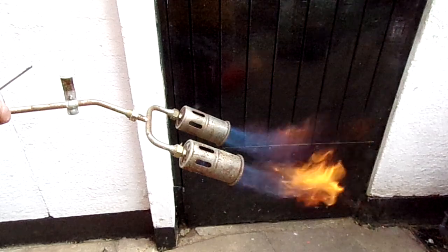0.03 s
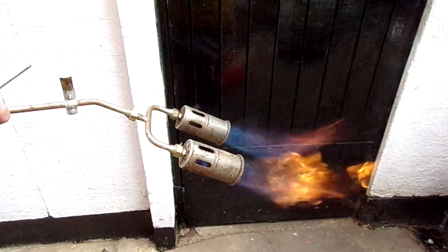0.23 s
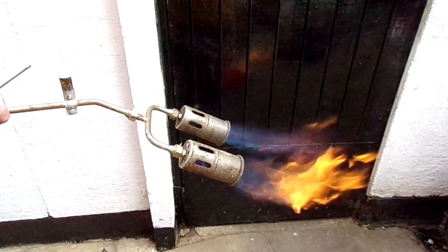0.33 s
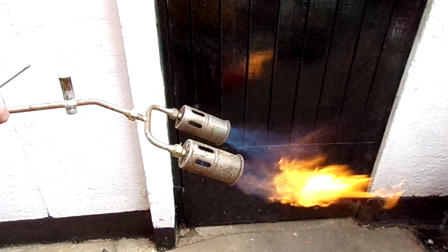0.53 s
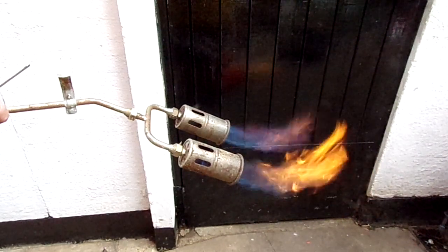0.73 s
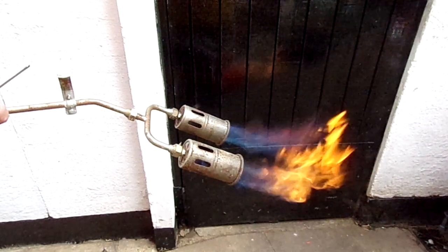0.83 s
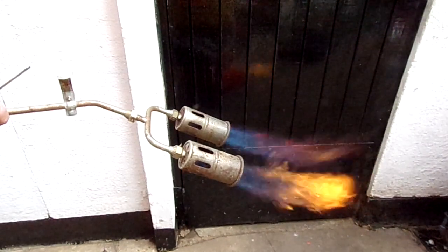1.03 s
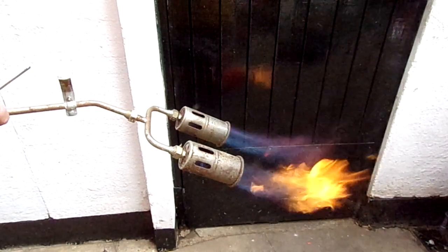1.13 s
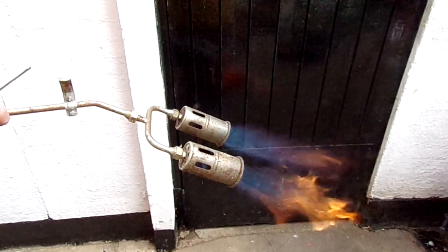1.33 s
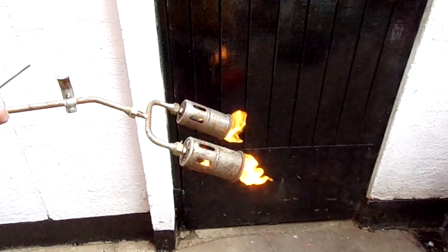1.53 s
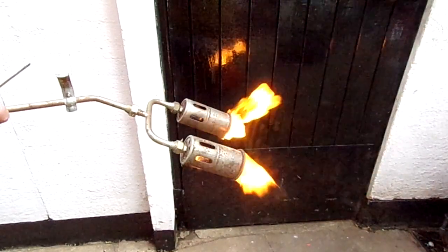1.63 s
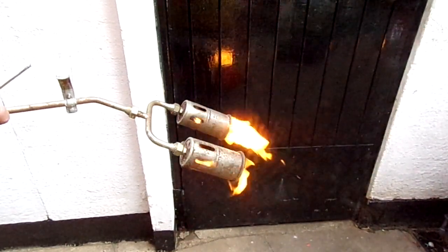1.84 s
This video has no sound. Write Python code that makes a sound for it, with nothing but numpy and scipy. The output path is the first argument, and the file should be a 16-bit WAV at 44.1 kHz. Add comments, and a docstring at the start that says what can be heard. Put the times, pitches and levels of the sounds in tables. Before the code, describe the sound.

Close to the microphone, in front of a door, a gas torch swells into a loud, hissing roar. Then the gas is cut back, leaving a small metal clack and a quiet, fluttering flame.

```python
"""A twin-cup propane torch, opened up in front of a door and heard from close by.
Its blue jets roar and ring their steel cups while gas hisses from the nozzles, both shaken by one
turbulence. The gas is cut back, the valve clacks, and a lazy yellow flame goes on fluttering over a
thin whistle of gas. The walls and door return a short, dull tail to the microphone."""
import sys
import numpy as np
from scipy import signal
from scipy.fft import rfft, irfft
from scipy.io import wavfile

SR = 44100
rng = np.random.default_rng(int(sys.argv[2]) if len(sys.argv) > 2 else 0)


def log_audio(samples):
    """Write samples as a 16-bit WAV file to the path given in sys.argv[1]."""
    # one column per channel
    frames = np.atleast_2d(samples).T
    # limit to full scale, then quantise
    limited = np.clip(frames, -1, 1)
    pcm = np.round(limited * 32767).astype(np.int16)
    wavfile.write(sys.argv[1], SR, pcm)


N = 83790
BAND_TOP_HZ = 15740

# The blue jets, the flame body and the cups' howl. Each row: time in seconds, level in dB.
JET_LEVEL = [(.034, -100), (.038, -50.5), (.065, -43), (.15, -40), (.22, -34), (.32, -32), (.39, -24.5),
             (.5, -22.5), (.8, -21.5), (1.04, -23), (1.17, -22), (1.29, -24), (1.38, -22.5), (1.42, -36),
             (1.47, -58), (1.54, -81)]
RUMBLE_LEVEL = [(.033, -100), (.05, -49), (.18, -53), (.22, -42.5), (.35, -43), (.4, -34), (.6, -31),
                (.8, -32), (.9, -39.5), (1.0, -29.5), (1.1, -43), (1.2, -27), (1.28, -35.5), (1.38, -37),
                (1.44, -39.5), (1.54, -74)]
HOWL_LEVEL = [(.034, -110), (.06, -59), (.55, -42), (.7, -28.5), (.9, -36.5), (.97, -54), (1.03, -29),
              (1.09, -46.5), (1.17, -24), (1.34, -35.5), (1.41, -56), (1.46, -100)]
# The tone of the jets and of the flame body. Each row: frequency in Hz, relative level in dB.
JET_SPECTRUM = [(25, -49), (100, -22), (168, -30), (196, -1), (270, 0), (305, -5.5), (335, -5),
                (370, -10.5), (490, -15.5), (570, -15), (690, -27), (780, -13.5), (1100, -13), (1400, -14),
                (1550, -12), (2100, -15), (2800, -18.5), (4200, -22.5), (8000, -49), (16000, -62)]
RUMBLE_SPECTRUM = [(22, -29), (45, -20), (64, -21), (84, 5), (98, -9), (117, 10.5), (145, -1), (165, 5.5),
                   (200, -44), (500, -74)]
# The steel cups' resonances. Each row: frequency in Hz, width in Hz, relative level in dB.
CUP_RESONANCES = [(606, 42.5, -3), (812, 176, -9), (966, 55, -14.5), (1300, 33, -6.5), (1827, 160, -6),
                  (2036, 95, -8), (2514, 167, -10), (3040, 52, -19.5), (3233, 65, -15)]

def blue_jets(flutter_db):
    """The jets burn and ring the cups, whose main resonance howls over the flame body's rumble."""
    roar = amp(curve(JET_LEVEL)) * colour(combustion(flutter_db), JET_SPECTRUM, CUP_RESONANCES)
    rumble = amp(curve(RUMBLE_LEVEL)) * colour(rng.standard_normal(N), RUMBLE_SPECTRUM)
    howl_db = curve(HOWL_LEVEL) + 1.2 * wander(rate_hz=78)
    howl = amp(howl_db) * whistle(hz=615.4, width_hz=22)
    return roar + rumble + howl


def combustion(flutter_db, bursts_per_s=1800, crackle_share=0.15):
    """Turbulent burning: a rush and many tiny bursts, fluttering together."""
    onsets = rng.random(N) < bursts_per_s / SR
    bursts = onsets * amp(1.5 * np.minimum(rng.exponential(1, N), 4))
    crackle = np.sqrt(crackle_share) * unit(bursts - bursts.mean())
    rush = np.sqrt(1 - crackle_share) * rng.standard_normal(N)
    return (rush + crackle) * amp(flutter_db)


# Gas rushing from the nozzles. Each row: time in seconds, level in dB.
GAS_LEVEL = [(.034, -105), (.037, -66), (.07, -58.5), (.26, -51), (.41, -40), (.48, -38.5), (.7, -38),
             (.98, -38.5), (1.08, -36), (1.26, -42.5), (1.31, -35.5), (1.395, -40), (1.43, -62),
             (1.48, -75), (1.78, -76), (1.9, -65)]
# The tone of that gas at the microphone. Each row: frequency in Hz, relative level in dB.
GAS_SPECTRUM = [(20, -48), (2000, -32), (3800, -10), (5200, 3.5), (6100, -1), (6900, -1), (7800, -10.5),
                (9800, -13), (11000, -12), (13200, -15.5), (14500, -21.5), (16000, -26)]

def gas_hiss(flutter_db, bands=24, sizzle_from_hz=10700):
    """Escaping gas hisses in bands that each swell on their own; the top fades a little less."""
    spectrum = rfft(colour(rng.standard_normal(N), GAS_SPECTRUM))
    hz = np.fft.rfftfreq(N, 1 / SR)
    gas_db = curve(GAS_LEVEL)
    flow_db = gas_db - gas_db.max()  # 0 at full flow, negative below it
    edges = np.linspace(0, BAND_TOP_HZ, bands + 1)
    rush = np.zeros(N)
    for low, high in zip(edges, edges[1:]):
        band = irfft(spectrum * (hz >= low) * (hz < high), N)
        sizzle_db = -0.04 * np.maximum(flow_db, -20) * (low > sizzle_from_hz)
        rush += band * amp(3 * wander(rate_hz=16) + sizzle_db)
    return amp(gas_db + 0.87 * flutter_db) * (unit(rush) + edge_tones(flow_db))


# The two nozzles. Each row: pitch at full flow in Hz, width in Hz, level against the hiss in dB.
NOZZLE_TONES = [(9400, 250, -16.5), (9870, 320, -19)]

def edge_tones(flow_db, rise_hz_per_db=13.5, drift_hz=70.6):
    """Each nozzle sings a broken, breathy tone that rises with the flow."""
    out = np.zeros(N)
    for hz, width_hz, db in NOZZLE_TONES:
        pitch = hz + rise_hz_per_db * flow_db + drift_hz * wander(rate_hz=12.6)
        waver = amp(1.8 * wander(rate_hz=22))
        out += amp(db) * unit(waver * whistle(pitch, width_hz))
    return out


# The yellow flame at the cups. Each row: time in seconds, level in dB.
YELLOW_LEVEL = [(1.36, -54), (1.44, -37), (1.52, -51), (1.58, -43.5), (1.67, -49), (1.71, -46),
                (1.745, -49), (1.785, -47), (1.8, -41), (1.82, -45.5), (1.845, -40.5), (1.9, -44.5)]
# Its tone. Each row: frequency in Hz, relative level in dB.
YELLOW_SPECTRUM = [(25, -10), (80, -4), (190, 0.5), (240, 1), (320, -1), (480, -10.5), (600, -3.5),
                   (690, -9), (800, -8), (1400, -10), (2600, -11.5), (4200, -23), (6800, -28.5),
                   (10000, -49), (16000, -46)]
# Its turbulence. Each row: rate in Hz, depth in dB.
YELLOW_FLUTTER = [(35, .9), (160, 0.73)]
# Pockets of gas catching. Each row: start in seconds, pitch in Hz, level in dB, length in seconds.
GAS_PUFFS = [(1.57, 110, -50, 0.02), (1.617, 71, -41, .028)]

def yellow_flame():
    """With the gas cut back, a soft flame flutters and pockets of gas catch in low puffs."""
    flutter_db = turbulence(YELLOW_FLUTTER)
    alight = np.arange(N) / SR > YELLOW_LEVEL[0][0]
    out = amp(curve(YELLOW_LEVEL)) * alight * colour(combustion(flutter_db), YELLOW_SPECTRUM)
    for start, hz, db, length in GAS_PUFFS:
        t = np.arange(0, length, 1 / SR)
        swell = amp(db) * np.sin(np.pi * t / length)
        add(out, start, swell * np.sin(2 * np.pi * hz * t))
    return out


# The valve lever closing. Each row: start in seconds, gain in dB, treble cutoff in Hz.
LEVER_CONTACTS = [(1.5841, 1.5, 3900), (1.5864, -2, 3900), (1.5891, -1, 12500)]
# The valve's metal. Each row: frequency in Hz, relative level in dB, seconds to fall by 60 dB.
VALVE_MODES = [(2713, -46, .03), (3080, -46, .025), (4060, -52, .09), (4791, -52, .05), (7224, -57, .05),
               (8802, -54, .03)]
# The tone of the lever's scrape. Each row: frequency in Hz, relative level in dB.
SCRAPE_SPECTRUM = [(20, -40), (1500, -18), (2900, 9.5), (5000, -4), (9000, -15), (16000, -30)]

def valve_clack(scrape_db=-36, scrape_t60_s=.032):
    """The lever lands in quick contacts, each a scrape and a short metal ring."""
    out, t = np.zeros(N), np.arange(SR // 5) / SR
    for start, gain_db, cutoff_hz in LEVER_CONTACTS:
        ring = sum(amp(db - 60 * t / t60) * np.sin(2 * np.pi * (hz * t + rng.random()))
                   for hz, db, t60 in VALVE_MODES)
        grit = colour(rng.standard_normal(len(t)), SCRAPE_SPECTRUM)
        scrape = amp(scrape_db - 60 * t / scrape_t60_s) * grit
        lowpass = signal.butter(2, cutoff_hz, fs=SR, output="sos")
        add(out, start, amp(gain_db) * signal.sosfilt(lowpass, ring + scrape))
    return out


# The nearly shut valve, faint behind the flame. Each row: pitch in Hz, width in Hz, level in dB.
TRICKLE_TONES = [(4160, 130, -69.5), (6200, 220, -76), (11070, 280, -79)]

def gas_trickle(start_s=1.45, waver_db=3.5):
    """The last trickle of gas whistles through the valve, coming and going."""
    tones = sum(amp(db + waver_db * wander(rate_hz=12)) * whistle(hz, width_hz)
                for hz, width_hz, db in TRICKLE_TONES)
    return tones * (np.arange(N) / SR > start_s)


def room(direct, tail_db=-16, t60_s=0.29, cutoff_hz=5830):
    """A short, dull tail from the walls and door reaches the microphone 5 ms after the direct sound."""
    t = np.arange(SR // 2) / SR
    tail = rng.standard_normal(len(t)) * amp(-60 * t / t60_s) * (t > .005)
    tail = signal.sosfilt(signal.butter(1, cutoff_hz, fs=SR, output="sos"), tail)
    return direct + amp(tail_db) * signal.fftconvolve(direct, tail / np.linalg.norm(tail))[:N]


def amp(db):
    """Decibels to gain."""
    return 10 ** (np.asarray(db) / 20)


def unit(x):
    """Scales to rms 1."""
    return x / np.sqrt(np.mean(x ** 2) + 1e-20)


def curve(points):
    """Joins rows of time and value by straight lines."""
    return np.interp(np.arange(N) / SR, *np.transpose(points))


def colour(x, spectrum, resonances=()):
    """Gives x a broad spectrum plus resonances, at rms 1."""
    hz = np.fft.rfftfreq(len(x), 1 / SR)
    row_hz, row_db = np.transpose(spectrum)
    power = amp(np.interp(np.log(hz + 1), np.log(row_hz), row_db)) ** 2
    for peak_hz, width_hz, peak_db in resonances:
        power += amp(peak_db) ** 2 / (1 + 2 * ((hz - peak_hz) / width_hz) ** 2) ** 2
    return unit(irfft(rfft(x) * np.sqrt(power), len(x)))


def wander(rate_hz):
    """Smooth random motion up to about the given rate, at rms 1."""
    hz = np.fft.rfftfreq(N, 1 / SR)
    passband = (hz > 2) * np.exp(-(hz / rate_hz) ** 2 / 2)
    return unit(irfft(rfft(rng.standard_normal(N)) * passband, N))


def turbulence(rows):
    """A flame's flutter in dB: slow and fast random motion added together."""
    return sum(depth_db * wander(rate_hz) for rate_hz, depth_db in rows)


def whistle(hz, width_hz):
    """A fuzzy tone: a narrow band of noise that follows a pitch."""
    phase = 2 * np.pi * np.cumsum(hz * np.ones(N)) / SR
    return unit(wander(width_hz / 2) * np.cos(phase) + wander(width_hz / 2) * np.sin(phase))


def add(mix, start_s, sound):
    """Mixes a sound in at a time."""
    part = mix[round(start_s * SR):][:len(sound)]
    part += sound[:len(part)]


# The turbulence of the open torch. Each row: rate in Hz, depth in dB.
JET_FLUTTER = [(22, 0.47), (170, 0.82)]

def scene():
    """The torch in front of the door, in mono; its roar and hiss flutter together."""
    flutter_db = turbulence(JET_FLUTTER)
    torch = blue_jets(flutter_db) + gas_hiss(flutter_db) + yellow_flame() + gas_trickle() + valve_clack()
    return room(torch)[None]


# Narrow dips in the microphone's treble. Each row: frequency in Hz, width in Hz.
MICROPHONE_DIPS = [(3680, 250), (4385, 470), (8050, 210), (11720, 820)]

def record(dry):
    """One microphone, with narrow dips and a steep cut at the top of its band."""
    for hz, width_hz in MICROPHONE_DIPS:
        dry = signal.lfilter(*signal.iirnotch(hz, hz / width_hz, SR), dry)
    lowpass = signal.firwin(801, BAND_TOP_HZ, window=("kaiser", 9), fs=SR)
    return signal.oaconvolve(dry, lowpass[None], "same")


dry = scene()
out = record(dry)
log_audio(out)
```